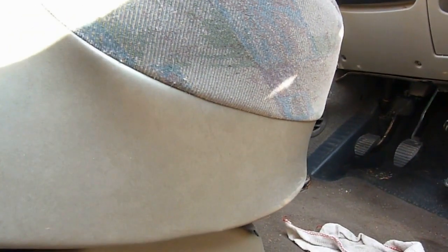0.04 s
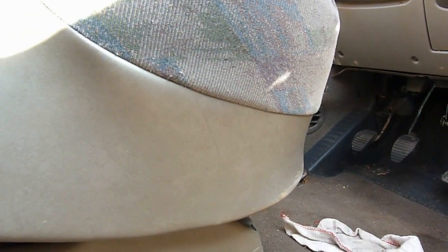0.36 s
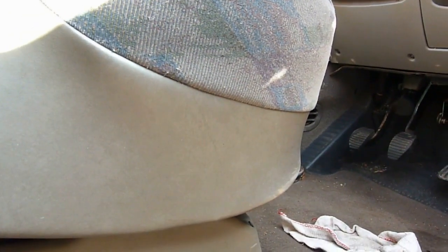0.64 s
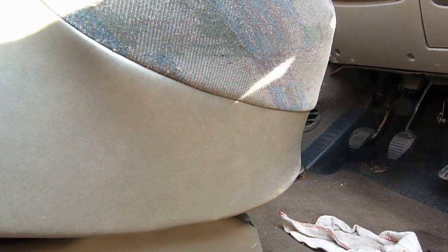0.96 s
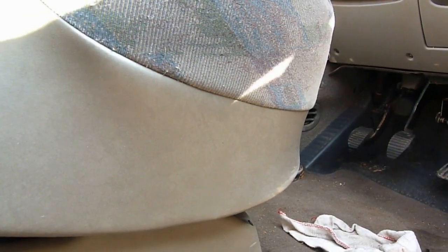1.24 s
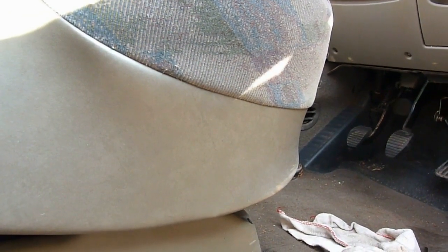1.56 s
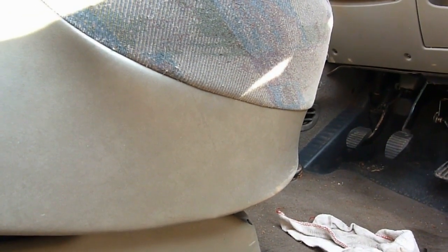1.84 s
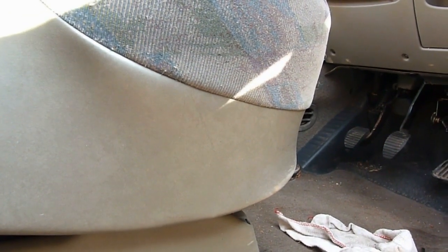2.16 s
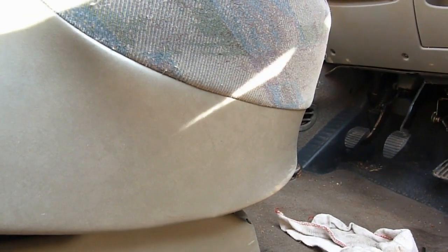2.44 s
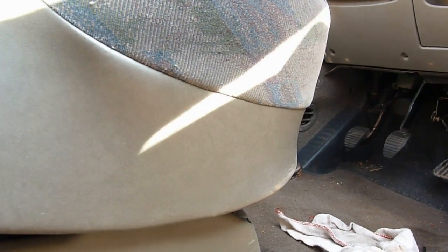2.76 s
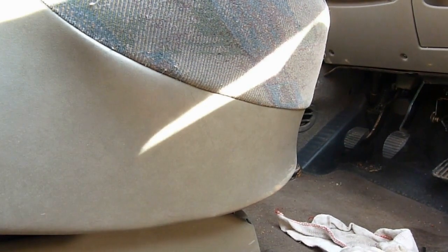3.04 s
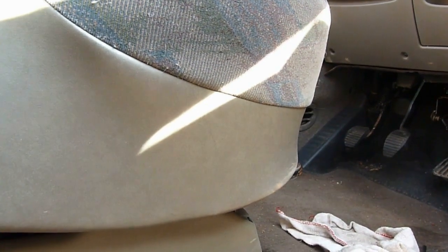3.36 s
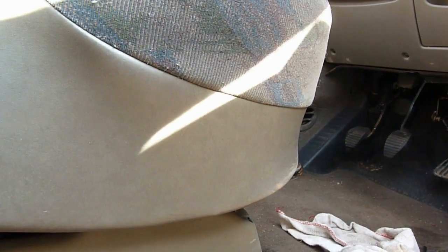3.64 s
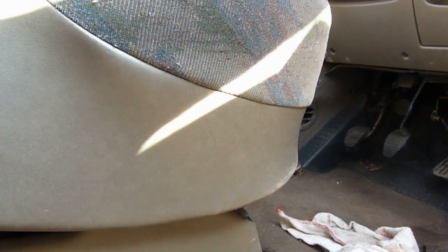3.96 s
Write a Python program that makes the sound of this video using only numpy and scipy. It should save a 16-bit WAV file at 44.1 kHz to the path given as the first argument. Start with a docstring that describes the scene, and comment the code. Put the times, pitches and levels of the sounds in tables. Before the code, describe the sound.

From between the front seats of a parked car, a fuel pump gives a rapid, pulsing buzz and cuts out. A key clicks, then the starter turns the engine over with whining chugs and a low rumble, without it catching.

```python
"""Fuel pump and starter, inside a parked car.

One microphone between the front seats, dull outdoor noise behind everything. An electric
plunger fuel pump buzzes at 17 strokes a second, ringing the panels, then stops. After a short
lull the starter clacks in and cranks the engine: on every compression its gears load up,
rasp and sag in pitch, while the engine rumbles through the cabin."""
import sys
import numpy as np
from scipy import signal
from scipy.fft import rfft, irfft
from scipy.io import wavfile

SR = 44100
rng = np.random.default_rng(int(sys.argv[2]) if len(sys.argv) > 2 else 0)


def unload_wav(signal):
    """Save mono or channel-first audio to the path in sys.argv[1] as 16-bit WAV at rate SR, clipped to [-1, 1]."""
    wavfile.write(
        sys.argv[1],
        SR,
        np.round(np.clip(np.atleast_2d(signal).T, -1, 1) * 32767).astype(np.int16),
    )


N = 176400
ENGAGE_S, RUMBLE_RISE_S = 2.708, .014  # cranking starts


def amp(db):
    """Decibels to gain."""
    return 10 ** (np.asarray(db) / 20)


def unit(x):
    """Scales to rms 1."""
    return x / np.sqrt(np.mean(x ** 2) + 1e-20)


def add(mix, start_s, sound):
    """Mixes a sound in at its start time."""
    at = round(start_s * SR)
    sound = sound[max(-at, 0):]
    part = mix[max(at, 0):][:len(sound)]
    part += sound[:len(part)]


def colour(x, outline):
    """Causal filter with the given outline: f/Hz, gain/dB."""
    hz, db = np.transpose(outline)
    f = abs(np.fft.fftfreq(4096, 1 / SR))
    log_gain = np.log(amp(np.interp(np.log(f + 1), np.log(hz), db)))
    taps = np.fft.ifft(np.exp(np.conj(signal.hilbert(log_gain)))).real
    return signal.fftconvolve(x, taps[:len(taps) // 2])[:len(x)]


def wander(hz):
    """Smooth random motion of rms 1, up to about the given rate."""
    lowpass = np.exp(-(np.fft.rfftfreq(N, 1 / SR) / hz) ** 2)
    return unit(irfft(rfft(rng.standard_normal(N)) * lowpass, N))


def swell(t, start, length, rise, fall):
    """Attack, hold and release."""
    return np.clip((t - start) / rise, 0, 1) * np.exp(-np.maximum(t - start - length, 0) / fall)


# Panels around the microphone, rung by each stroke: f/Hz, level/dB, t60/s, rise/s
PANEL_MODES = [(136.3, -30.5, 0.16, 0.02), (172.3, -38.5, 0.35, 0.024), (222.8, -10.5, 0.16, 0.027),
               (284.8, -27.5, 0.14, 0.015), (357.5, -32.5, 0.11, 0.0021), (402.1, -34, 0.22, 0.017),
               (458.6, -37, 0.17, 0.004), (613.8, -21, 0.078, 0.0034), (661, -12, 0.012, 0.00084),
               (675, -22, 0.062, 0.001), (802.4, -44, 0.27, 0.0011), (890, -35.5, 0.029, 0.0011),
               (1028, -42, 0.166, 0.0061), (1164, -33, 0.025, 0.0019), (1278, -44, 0.2, 0.001),
               (1479, -47.5, 0.031, 0.0015), (1769, -49, 0.097, 0.0006), (2520, -45.5, 0.036, 0.0008)]
# The plunger's pull-in, end stop and return: t/s into the stroke, relative level/dB
PLUNGER_KNOCKS = [(0, -11), (.0035, -11.5), (0.016, -9)]
# The mount's clatter as it reaches the seats: f/Hz, relative level/dB
CLATTER_SPECTRUM = [(200, -16.5), (450, -10.5), (800, 5.5), (1200, -5.5), (1700, -6), (2200, -13),
                    (2650, -14.5), (3000, -22.5), (4200, -35), (8000, -68)]
def fuel_pump(strokes=38, stroke_s=.0590986, knock_t60_s=.18, clatter_db=-50):
    """Each plunger stroke rings the same panels and rattles the mount in nearly the same way."""
    t = np.arange(SR // 4) / SR
    ring = sum(amp(db - 60 * t / t60) * (1 - np.exp(-t / rise)) * np.sin(2 * np.pi * hz * t) * (-1) ** k
               for k, (hz, db, t60, rise) in enumerate(PANEL_MODES))
    knocks = np.sqrt(sum((t >= delay) * amp(db - 60 * (t - delay) / knock_t60_s) ** 2
                         for delay, db in PLUNGER_KNOCKS))
    mount = rng.standard_normal(len(t))
    for _ in range(8):  # flatten the rattle, so that CLATTER_SPECTRUM sets its colour
        spectrum = rfft(mount * knocks)
        mount = unit(irfft(spectrum / abs(spectrum), len(t)) / (knocks + knocks.max() / 20))
    mount /= np.sqrt(np.average(mount ** 2, weights=knocks ** 2))
    panels, clatter = np.zeros(N), np.zeros(N)
    for k in range(strokes):
        beat = .00175 + k * stroke_s
        drift = .00104 * np.sin(2 * np.pi * (beat - .0357) / .6655)
        pull_in = beat + drift - .003
        force = amp(.14 * rng.standard_normal())
        add(panels, pull_in + .001472, force * ring)
        rattle = mount + .63 * rng.standard_normal(len(t))
        add(clatter, pull_in, force * knocks * rattle)
    return panels + amp(clatter_db) * unit(colour(clatter, CLATTER_SPECTRUM))


# Faint background tones in the cabin: f/Hz, level/dB
HUM_TONES = [(64.3, -54.5), (118.4, -57.5), (215.3, -53.5), (646, -60), (705.2, -53), (764.4, -62)]
# The outdoors, heard from inside the car: f/Hz, relative level/dB
OUTDOOR_SPECTRUM = [(25, -17.5), (48, -16.5), (90, -6), (150, -8.5), (230, -3.5), (400, -8), (550, -10),
                    (760, -13.5), (900, -20.5), (1350, -26), (1800, -22.5), (2200, -26.5), (2600, -39.5),
                    (4000, -43), (8000, -59)]
# Thin hiss: f/Hz, relative level/dB
HISS_SPECTRUM = [(1000, -1.5), (3000, 2), (4500, -2), (5600, 2), (6600, -3), (7600, -1.5), (8400, -4.5)]
def background(waver_hz=2.5, hum_dip_db=-10.5):
    """Dull outdoor noise, a thin hiss and a wavering hum that drops once cranking starts."""
    hum = np.zeros(N)
    for hz, db in HUM_TONES:
        phase = 2 * np.pi * np.cumsum(hz + waver_hz * wander(9.4)) / SR
        hum += amp(db) * np.sqrt(2) * np.sin(phase)
    cranking = np.clip((np.arange(N) / SR - ENGAGE_S) / RUMBLE_RISE_S, 0, 1)
    outdoors = amp(-48) * unit(colour(rng.standard_normal(N), OUTDOOR_SPECTRUM))
    hiss = amp(-70.5) * unit(colour(rng.standard_normal(N), HISS_SPECTRUM))
    return hum * amp(hum_dip_db * cranking) + outdoors + hiss


# Pump mount ticks, then the key switch at arm's length and the solenoid: t/s, level/dB, decay/s
CLICK_HITS = [(.936, -47, .002), (1.743, -46, .002), (2.683, -51, .005), (2.698, -38.5, 0.017),
              (2.7099, -29.5, 0.0099), (2.7136, -22.5, .008), (2.736, -37, 0.016)]
# Their colour at the microphone: f/Hz, relative level/dB
CLICK_SPECTRUM = [(200, -6), (800, -4.5), (1300, 6.5), (1900, 4.5), (2700, -17), (4000, -26.5),
                  (5500, -35.5), (8000, -68)]
def clicks():
    """Stray ticks; then the switch clicks and the pinion slams into the flywheel."""
    t = np.arange(N) / SR
    hits = sum(amp(db) * (t >= start) * np.exp(-abs(t - start) / decay)
               for start, db, decay in CLICK_HITS)
    noise = rng.standard_normal(N)
    return colour(hits * noise, CLICK_SPECTRUM) / np.std(colour(noise, CLICK_SPECTRUM))


# Resonances of the starter and bell housing: f/Hz, width/Hz at order 1, gain/dB
HOUSING_MODES = [(400, 210, -4), (615, 64, -3), (830, 12, -9), (934, 94, 4), (1184, 27, 7.5),
                 (1280, 38.5, 11.5), (1517, 22, 4.5), (1850, 25, 4.5), (1995, 43, 2), (2235, 22, 9.5)]
def housing(x, order):
    """The ring of the starter's metal housing; a higher order makes each resonance steeper."""
    ring = np.zeros(N)
    for hz, width, db in HOUSING_MODES:
        section = np.concatenate(signal.iirpeak(hz, hz / width / order, SR))
        ring += amp(db) * signal.sosfilt(np.tile(section, (order, 1)), x)
    return ring


# Compressions: t/s, length/s, relative level/dB, tooth rate at start f/Hz and at end f/Hz,
# share of the length before the sag, groan trim/dB, whine trim/dB
COMPRESSIONS = [(2.785, .078, -1.5, 304, 312, .3, -8, 0), (2.926, .088, 0, 485, 318, .33, 0, 0),
                (3.098, .034, 1, 495, 388, .2, 1.5, -1), (3.220, .046, .5, 510, 392, .22, 1.5, -2),
                (3.345, .043, 0, 495, 412, .3, -2, 0), (3.467, .04, -.5, 495, 416, .3, -1, 0),
                (3.587, .043, -2, 495, 415, .3, -1, -1), (3.706, .043, -2, 490, 412, .3, 0, 0),
                (3.828, .04, -.5, 495, 416, .3, 0, -1), (3.947, .041, -1.5, 490, 412, .3, 0, 0)]
# Multiples of the tooth rate, from the second up: relative level/dB
GEAR_HARMONICS = [-1.5, -3, -15, -21, -21.5]
# Rasp of the teeth, before the housing rings: f/Hz, relative level/dB
RASP_SPECTRUM = [(120, -30.5), (300, -4.5), (480, -1.5), (740, -7.5), (1100, -2.5), (1400, -11.5),
                 (1700, -7.5), (2300, -11), (2900, -19.5), (3800, -31), (5000, -46.5), (8000, -70.5)]
def starter(jitter=.0123, tooth_depth=.4, grit_per_s=530, load_rise_s=.0067, recover_s=.03):
    """Out in the engine bay, gear teeth groan, whine and rasp as each compression drags them down."""
    t = np.arange(N) / SR
    spin_up = amp(2) * swell(t, ENGAGE_S, load_rise_s, load_rise_s, fall=.094)
    load = spin_up + amp(-15.5) * (t > ENGAGE_S)  # a light load stays between compressions
    groan, whine, pitch_points = np.zeros(N), np.zeros(N), []
    for start, length, db, start_hz, end_hz, hold, groan_db, whine_db in COMPRESSIONS:
        pitch_points += [(start, start_hz), (start + hold * length, start_hz),
                         (start + length, end_hz), (start + length + recover_s, end_hz)]
        load += amp(db) * swell(t, start, length, load_rise_s, fall=.014)
        groan += amp(db + groan_db - 22.5) * swell(t, start, length, rise=.42 * length, fall=.018)
        # the whine starts early, as the housing takes time to ring up
        whine += amp(db + whine_db - 23.5) * swell(t, start - .007, length, rise=.021, fall=.0062)
    tooth_hz = np.interp(t, *np.transpose(pitch_points)) * (1 + jitter * wander(150))
    phase = 2 * np.pi * np.cumsum(tooth_hz) / SR
    overtones = sum(amp(db + 2 * wander(120)) * np.sin(k * (phase + k))  # worn teeth: uneven levels
                    for k, db in enumerate(GEAR_HARMONICS, 2))
    grit = unit(rng.standard_normal(N) * (rng.random(N) < grit_per_s / SR))
    teeth = unit((1 + tooth_depth * np.cos(phase)) ** 2 * rng.standard_normal(N))
    rasp = amp(-29) * load * unit(colour(teeth + .5 * grit, RASP_SPECTRUM))
    direct = groan * np.sin(phase) + rasp
    return (direct + housing(direct, order=1) + housing(whine * overtones, order=2)) / 2


# The turning engine, heard through the cabin: f/Hz, relative level/dB
RUMBLE_SPECTRUM = [(25, -9.5), (70, -24), (115, -11.5), (160, -13), (220, 1), (265, -7.5), (380, -1.5),
                   (520, -13), (750, -15), (1400, -48.5), (4000, -66)]
def engine(boom_hz=218, boom_lead_s=.02, boom_width_s=.017):
    """The turning engine rumbles, and rocks the cabin just ahead of each compression."""
    t = np.arange(N) / SR
    cranking = np.clip((t - ENGAGE_S) / RUMBLE_RISE_S, 0, 1)
    rumble = amp(-35) * cranking * unit(colour(rng.standard_normal(N), RUMBLE_SPECTRUM))
    rocking = sum(np.exp(-((t - start + boom_lead_s) / boom_width_s) ** 2) for start, *_ in COMPRESSIONS)
    return rumble + amp(-35.5) * rocking * np.sin(2 * np.pi * boom_hz * t)


def scene():
    """Everything in mono, from between the front seats."""
    return (fuel_pump() + clicks() + starter() + engine() + background())[None]


def record(dry):
    """The recorder's band limit."""
    lowpass = signal.firwin(255, cutoff=8150, window=("kaiser", 8), fs=SR)
    return signal.oaconvolve(dry, lowpass[None], "same")


dry = scene()
out = record(dry)
unload_wav(out)
```